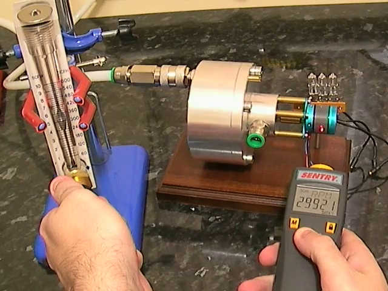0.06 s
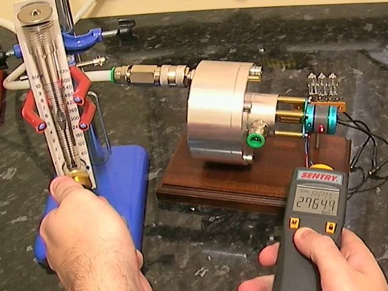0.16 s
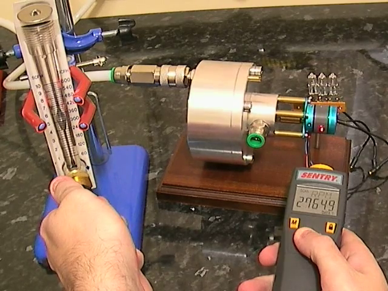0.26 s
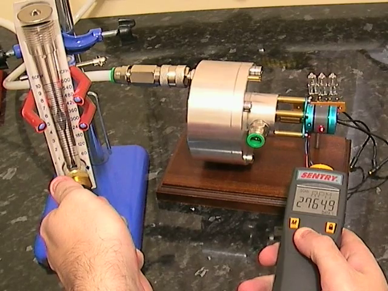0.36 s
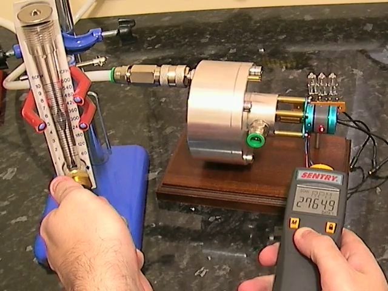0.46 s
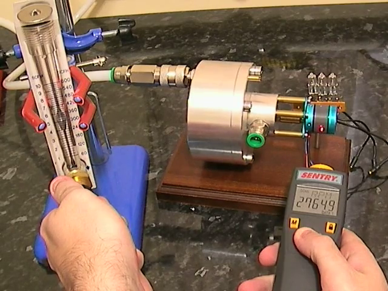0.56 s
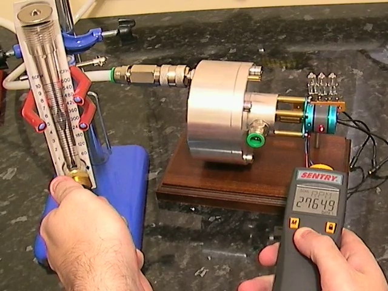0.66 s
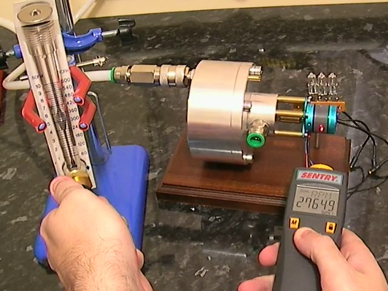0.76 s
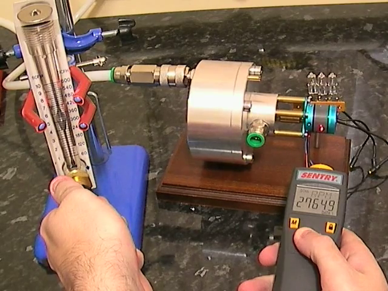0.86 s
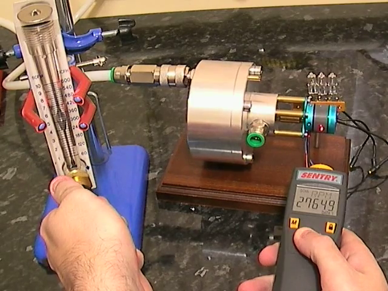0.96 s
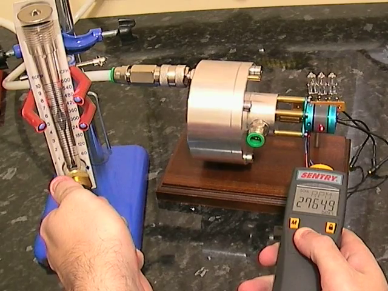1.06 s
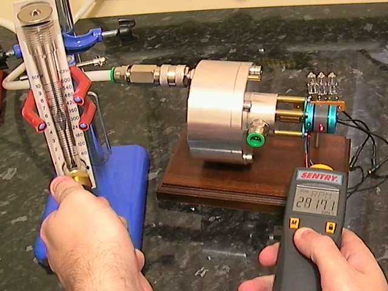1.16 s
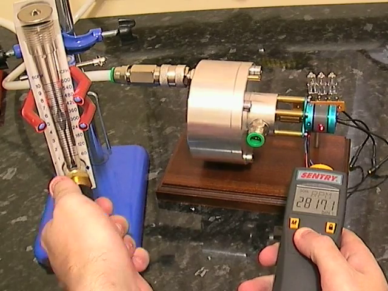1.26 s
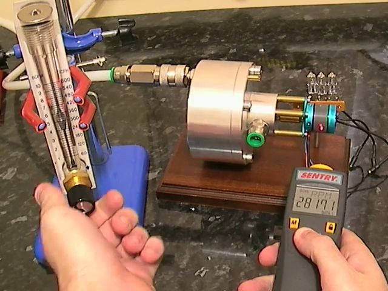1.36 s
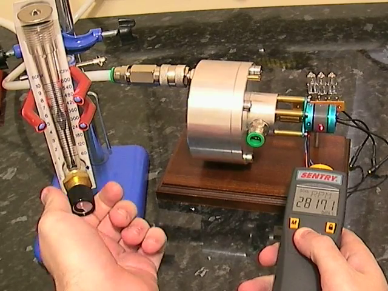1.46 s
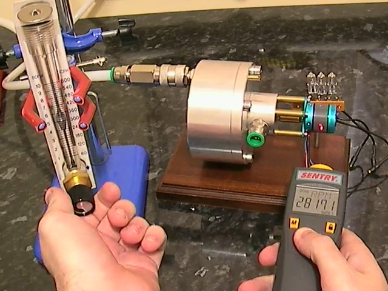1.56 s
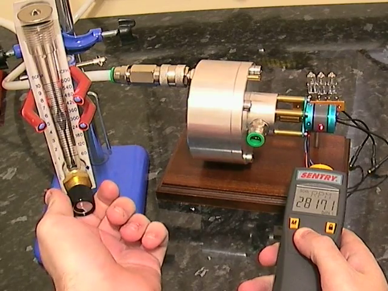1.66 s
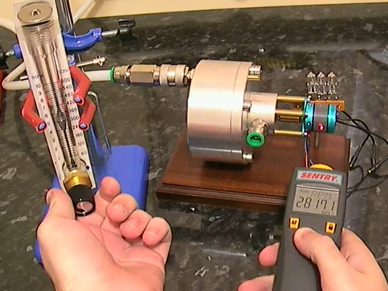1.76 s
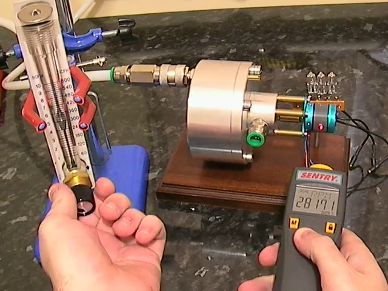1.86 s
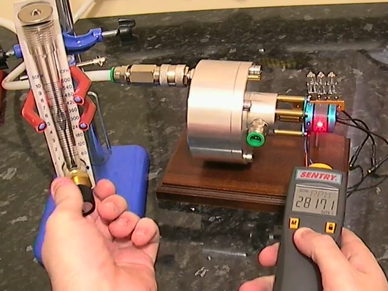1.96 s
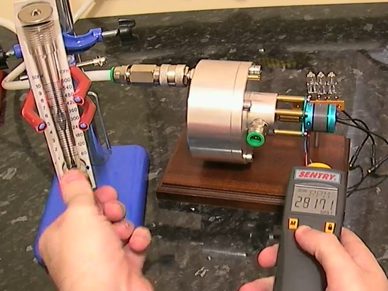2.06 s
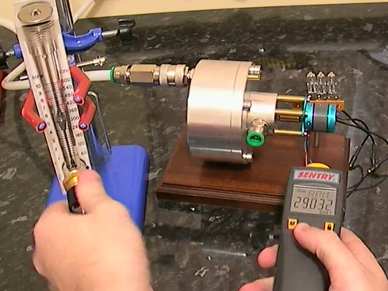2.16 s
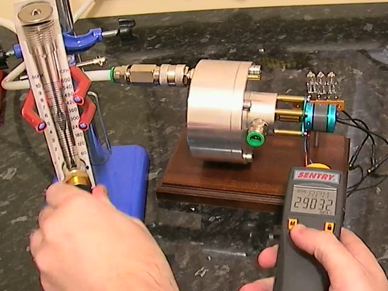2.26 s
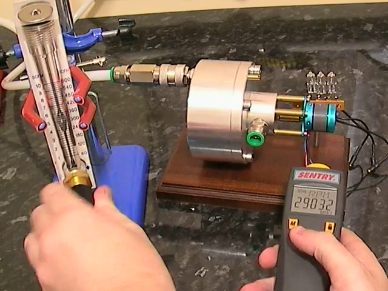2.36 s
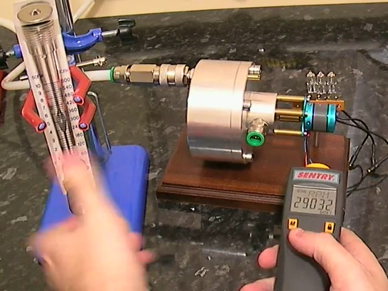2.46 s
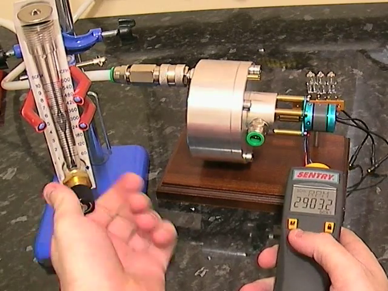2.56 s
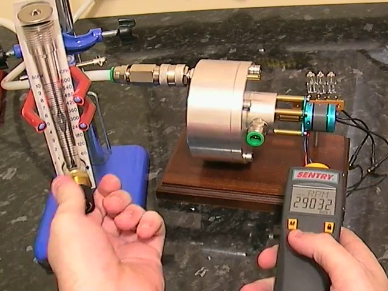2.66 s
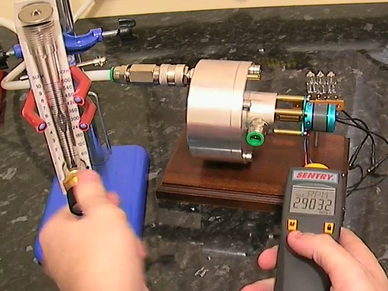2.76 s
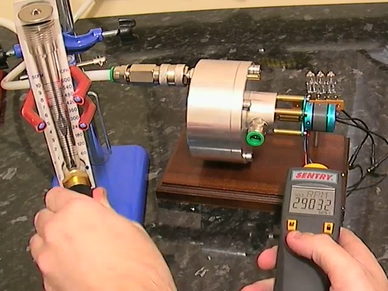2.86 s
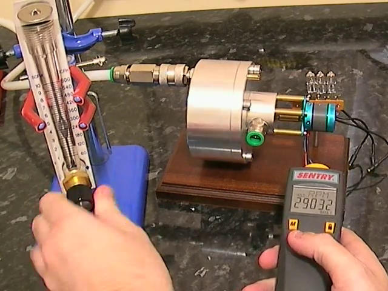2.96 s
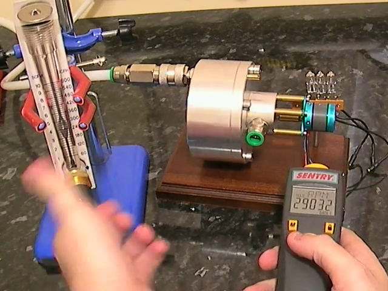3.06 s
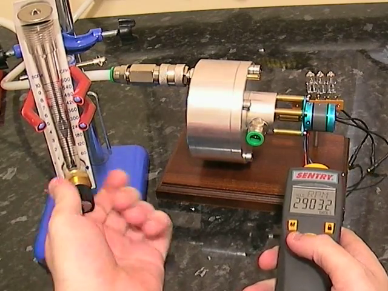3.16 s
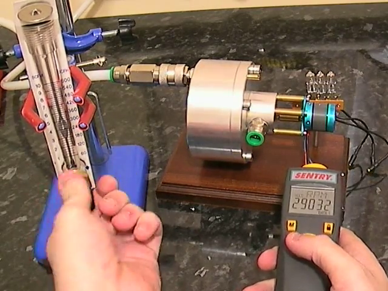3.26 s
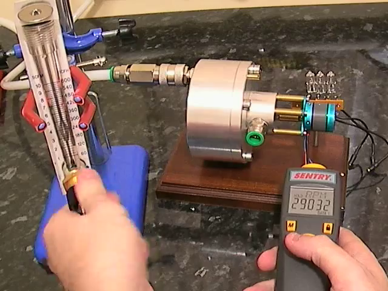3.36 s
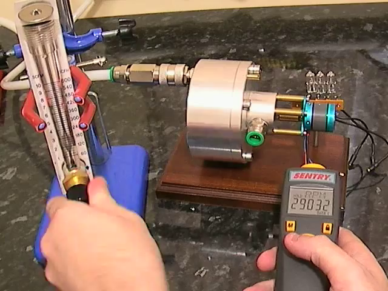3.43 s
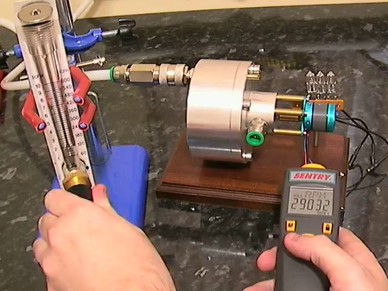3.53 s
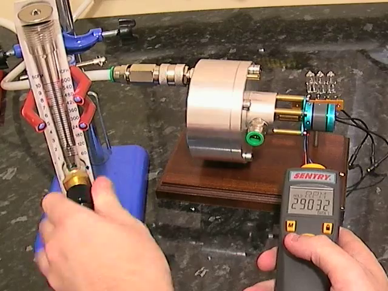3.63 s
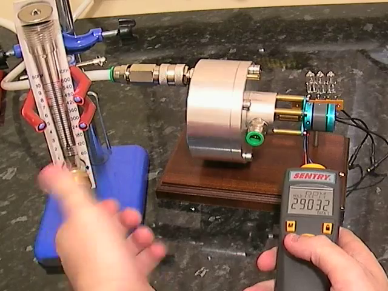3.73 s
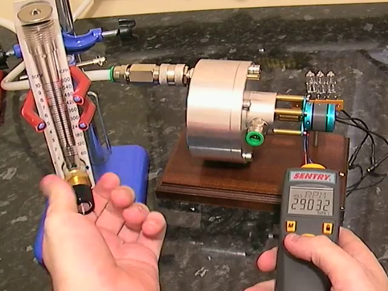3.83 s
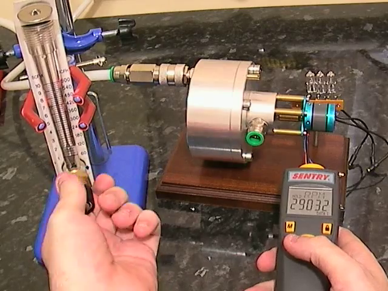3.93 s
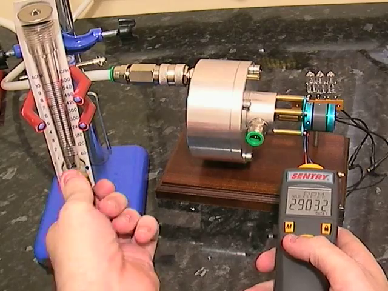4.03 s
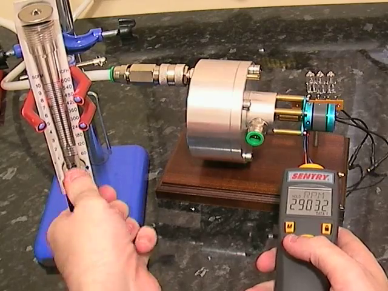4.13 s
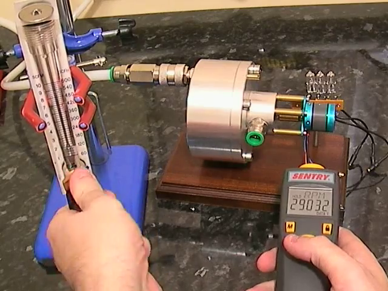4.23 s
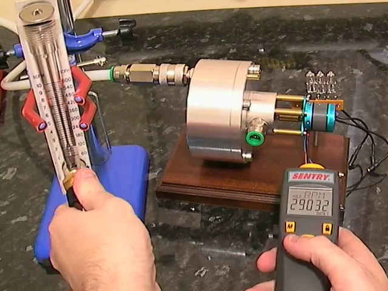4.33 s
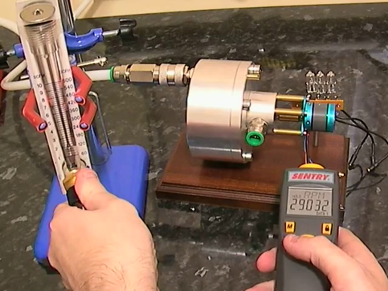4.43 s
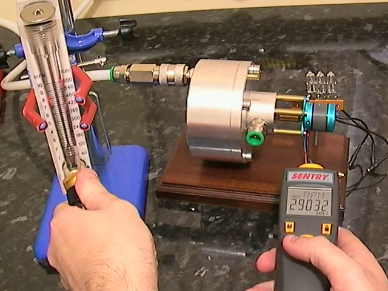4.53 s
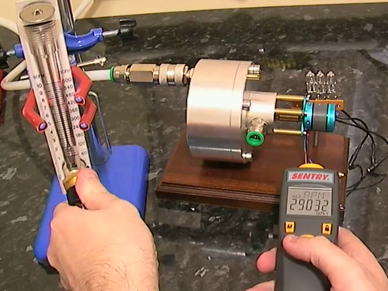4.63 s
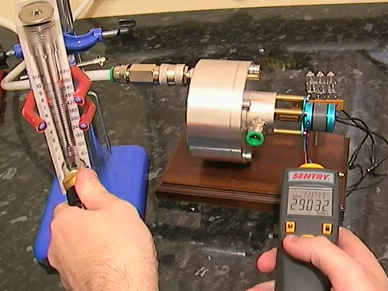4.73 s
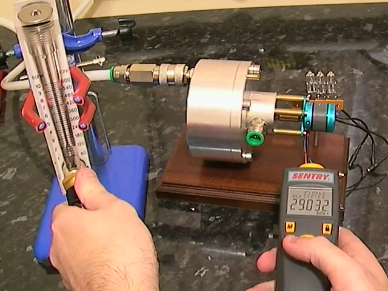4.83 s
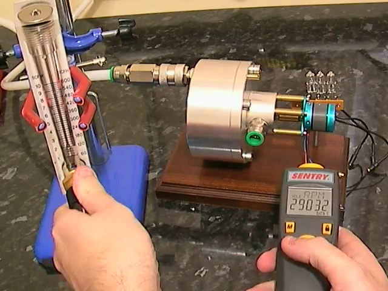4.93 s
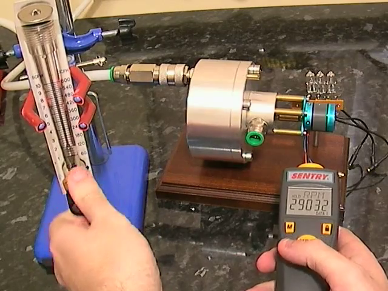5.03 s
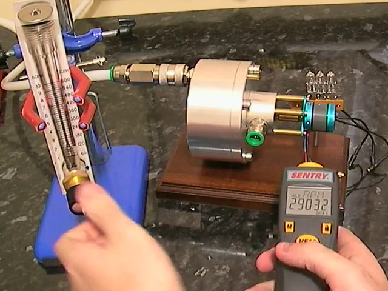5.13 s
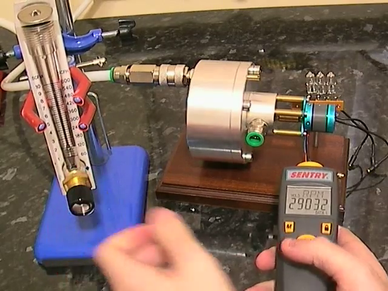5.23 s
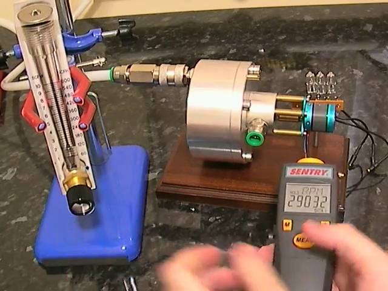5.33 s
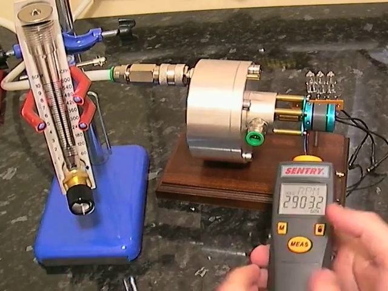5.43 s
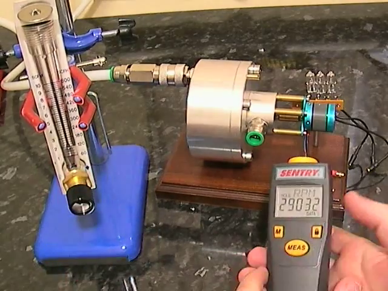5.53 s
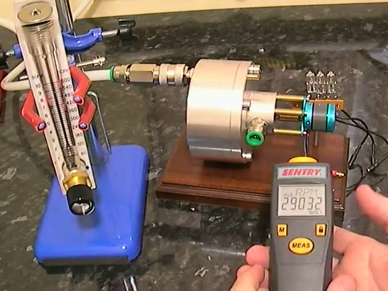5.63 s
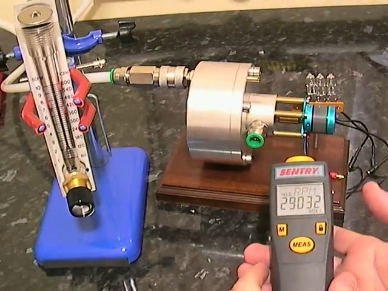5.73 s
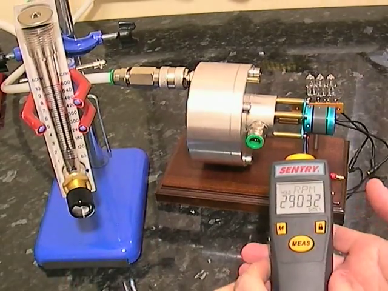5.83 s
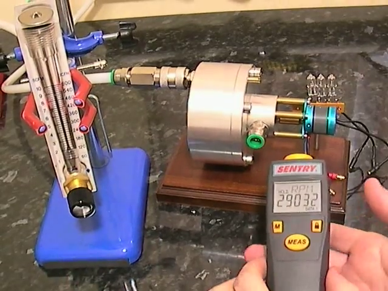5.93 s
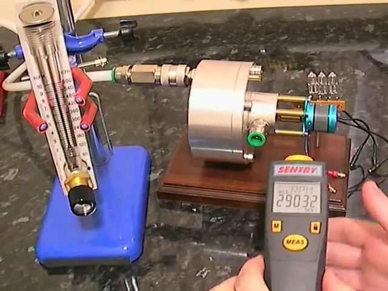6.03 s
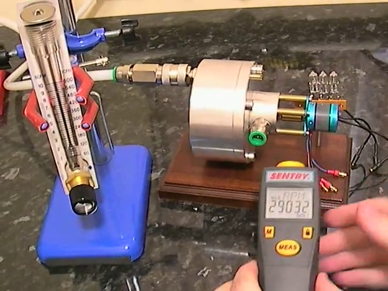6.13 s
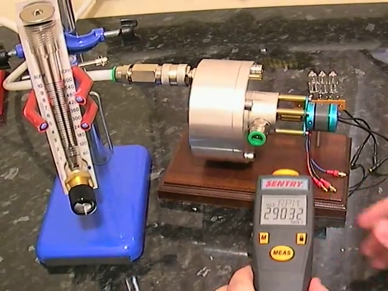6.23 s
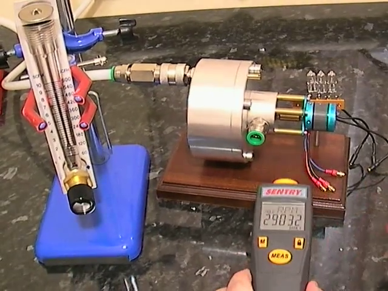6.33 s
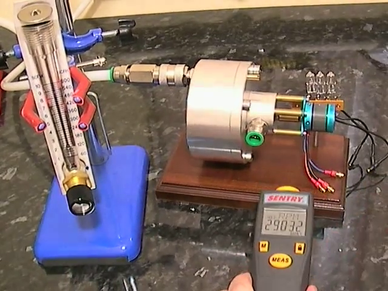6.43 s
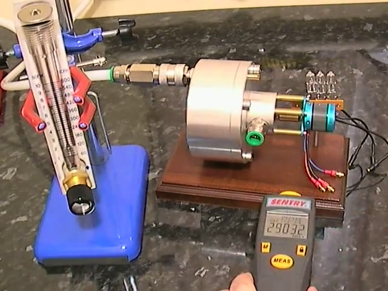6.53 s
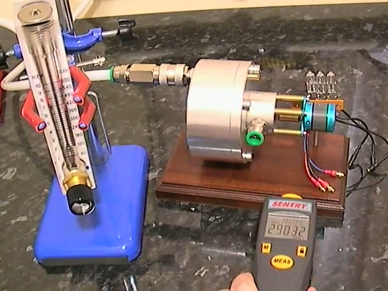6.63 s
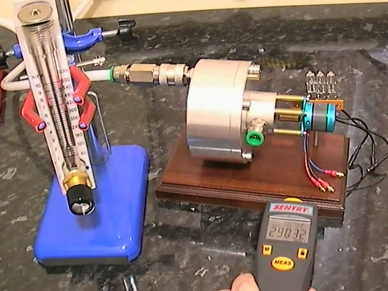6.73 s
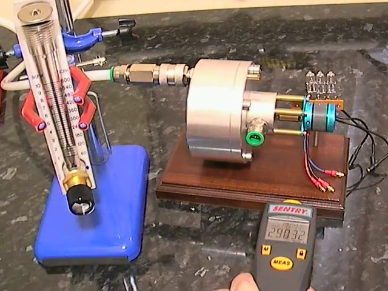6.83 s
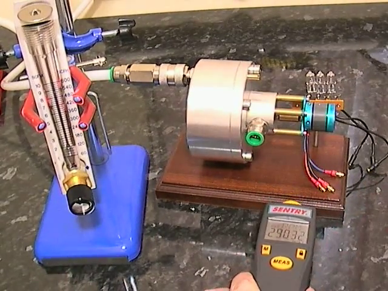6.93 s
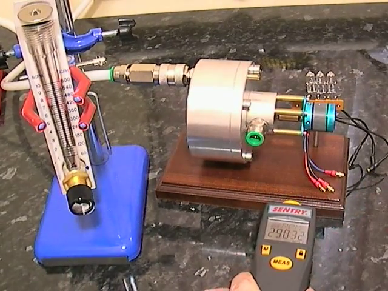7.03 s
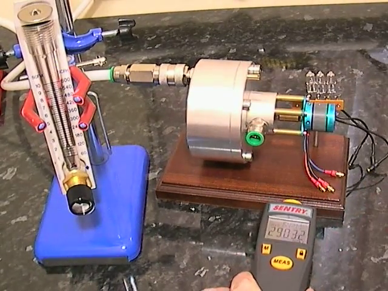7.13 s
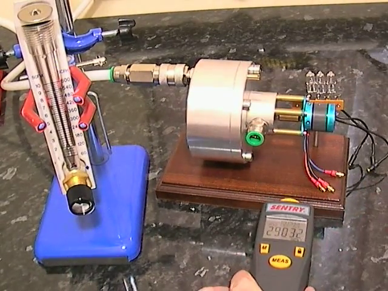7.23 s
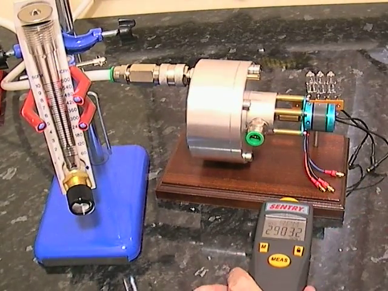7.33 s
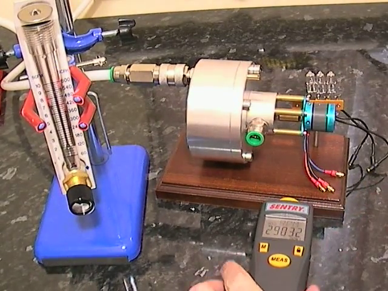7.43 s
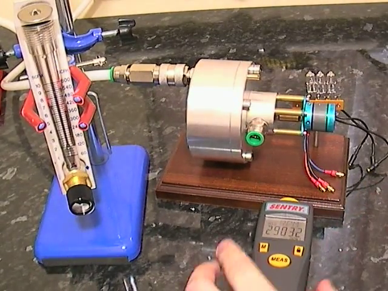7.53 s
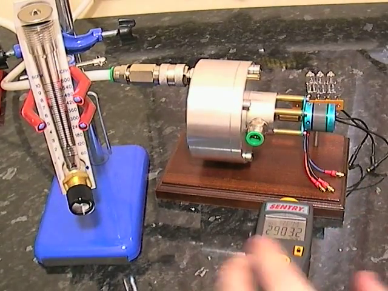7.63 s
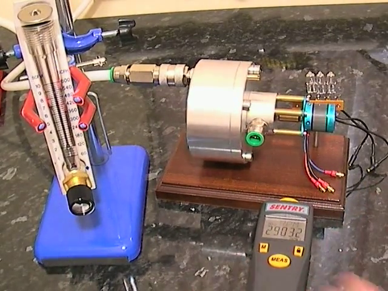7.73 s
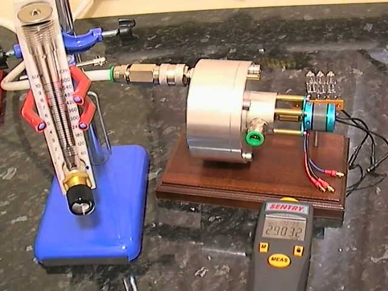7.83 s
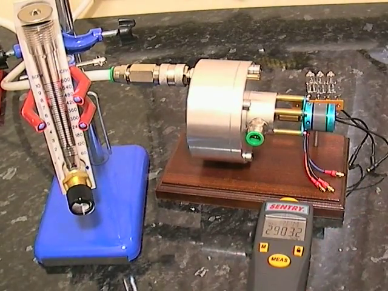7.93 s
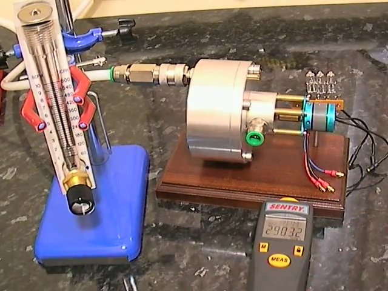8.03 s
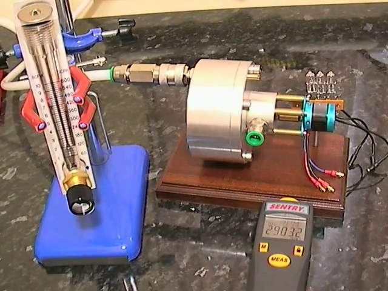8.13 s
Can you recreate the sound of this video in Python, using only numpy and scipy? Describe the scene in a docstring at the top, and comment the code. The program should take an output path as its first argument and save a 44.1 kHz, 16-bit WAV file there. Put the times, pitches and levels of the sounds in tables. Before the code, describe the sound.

Jet hiss dies away, a fast rotor screams briefly and slides down in pitch, slowing into hum, bearing rattle and faint bench rumble.

```python
"""A small 14-blade air turbine runs at about 29000 rpm on its wooden base, then whines loudly and coasts down.
Place: a small room. Distance: close by. Microphone: stereo, with the exhaust to its right.
As the valve is screwed shut, the jet noise, hiss and sizzle die and the rotor slows by friction and drag.
Blade tones sweep through exhaust and metal resonances; unbalance and bearing rattle, through base and housing.
Hand knocks and bench rumble lie around it; the recorder ducks under loud sound."""
import sys
import numpy as np
from scipy import signal
from scipy.fft import rfft, irfft, next_fast_len
from scipy.io import wavfile
from scipy.ndimage import uniform_filter1d, minimum_filter1d

SR = 44100
rng = np.random.default_rng(int(sys.argv[2]) if len(sys.argv) > 2 else 0)


def wav_record(signal):
    """Record a signal, one row per channel, as 16-bit PCM in the file named by sys.argv[1]."""
    frames = np.transpose(np.atleast_2d(signal))
    bounded = np.clip(frames, -1, 1)
    # unit amplitude maps onto the largest positive 16-bit level
    quanta = np.round(bounded * 32767).astype(np.int16)
    wavfile.write(sys.argv[1], SR, quanta)


N = 360734
TIME = np.arange(N) / SR
SIZE = next_fast_len(N + SR // 2, True)
FREQ = np.maximum(np.arange(SIZE // 2 + 1) * SR / SIZE, 1)

# Background: relative colour of the faint steady hiss and of the bench rumble: f/Hz, level/dB
QUIET_COLOUR = [(1710, -1), (2900, -0.5), (3830, -4), (4330, -3.5), (5430, 4), (6720, -1), (7650, -5),
                (7950, -40), (8160, -11), (8590, -10), (10200, -0.5), (13000, -2), (13600, -6)]
RUMBLE_COLOUR = [(18, -52), (30, -20), (86, -14.5), (123, -2.5), (151, -4), (237, 4), (265, 1.5), (330, -1),
                 (430, -38), (730, -120)]
# Small knocks of handling: t/s, level/dB, centre f/Hz, width/Hz, decay/s
HAND_KNOCKS = [(5.81, -38, 3800, 2500, .008), (6.44, -44, 11000, 4000, .004), (7.143, -33, 260, 110, .01),
               (7.195, -30, 3300, 1300, .0025), (7.203, -39, 3300, 1300, .004)]
# Air flow as the valve is screwed shut: t/s, share of full flow
AIR_FLOW = [(0.0, 1.0), (1.5, 0.982), (2.25, 0.943), (2.771, 0.877), (2.907, 0.645), (3.305, 0.604),
            (3.493, 0.0)]
# Treble at the valve, before its trims: t/s, hiss level/dB, sizzle level/dB
VALVE_LEVELS = [(0.0, -21, -20), (0.01, -22.5, -25), (1.3, -22, -25.5), (1.4, -25.5, -19.5),
                (2.41, -23.5, -25), (2.65, -24.5, -22.5), (2.98, -19, -29), (3.11, -25, -26),
                (3.3, -23, -26)]
# Relative colour of the jet and of the valve hiss: f/Hz, level/dB
JET_COLOUR = [(330, -22.5), (560, -18.5), (728, -16), (886, -12.5), (945, -6.5), (1030, -15), (1200, -5.5),
              (1300, -12.5), (1600, -15), (2580, -1.5), (4400, 3), (5660, -8.5), (7040, -1.5), (7600, -15),
              (9880, -10.5), (16700, -120)]
HISS_COLOUR = [(4940, -25), (8400, -23), (9330, -1.5), (10300, 6.5), (12000, 2.5), (12300, -14),
               (16000, -37), (22000, -120)]
# Narrow housing resonances rung by the jet, relative level: f/Hz, width/Hz, level/dB
JET_HOUSING = [(2530, 85, -1.5), (3470, 170, -3), (4414, 30, 7), (4740, 410, -1)]
# Narrow housing resonances rung by the bearings, relative level: f/Hz, width/Hz, level/dB
BEARING_HOUSING = [(2584, 54, 0.5), (4523, 56, 6.5), (5490, 130, -1.5), (6320, 180, -1), (6540, 89, -1.5)]
# Relative colour of the rolling rush of the bearings: f/Hz, level/dB
RUSH_COLOUR = [(1650, -6.5), (2800, 1.5), (3150, -3), (4190, 0.5), (4510, -14), (4850, 0.5), (6790, -1.5),
               (7700, -9), (7910, -9), (8620, -11), (10400, -3.5), (12200, -9.5), (13600, -10)]
# Resonances of base and housing: f/Hz, width/Hz, level/dB
BODY_MODES = [(126.5, 8.9, -11.5), (178.8, 13, -9), (195.3, 5, -9), (245, 122, -9.5), (291, 20, -1.5),
              (324.4, 31, -9), (438, 4.7, -20.5), (487.6, 36, -16.5), (534.5, 17, -10.5), (625, 56, -11.5),
              (693.4, 25, -10), (801, 79, -7), (973, 184, -15.5), (1069, 46, -12.5), (1240, 300, -17),
              (1503, 63, -8), (1646, 196, -15.5), (1770, 170, -14), (1890, 90, -13), (2031, 118, -13),
              (2360, 600, -20), (2616, 60, -14), (3096, 82, -23), (3290, 51, -25), (4400, 630, -25.5)]
# Antiresonances between the modes of the base: f/Hz, half-width/Hz, depth 0-1
BODY_DIPS = [(221, 6.4, 1), (302.3, 13.2, 0.87), (357.6, 7.3, 1), (1216, 48, 0.07), (1634, 31, 0.5)]
# Relative force of one turn: multiple of the speed, level/dB
TURN_ORDERS = [(1, 6.5), (2, 0), (3, 0.5), (4, -1), (5, -2.5), (6, 1.5), (7, -3.5), (8, -1.5), (9, -3),
               (10, -1.5), (11, -3.5), (12, -2.5), (13, 2.5), (15, -4), (18, -2.5), (20, -4), (45, -16)]
# Weak whirl tones between the orders at full flow: multiple of the speed, level/dB
WHIRL_TONES = [(1.5, -42.5), (2.5, -36.5), (2.59, -45), (3.5, -43)]
# Exhaust resonances that the blade tone sweeps through: f/Hz, width/Hz, level/dB
EXHAUST_MODES = [(4500, 210, -23), (5050, 410, -9), (5410, 470, -0.5), (5790, 360, 2), (5958, 80, 5),
                 (6537, 190, -18)]
# Antiresonances of the exhaust passage: f/Hz, half-width/Hz, depth 0-1
EXHAUST_NOTCHES = [(6105, 45, .85), (6566, 13, .8)]
# Narrow metal rings, low and high, swept by the blade overtones: f/Hz, width/Hz, level/dB
METAL_RINGS = [(2433, 260, 7), (6920, 420, -1.5)]
# Relative coasting overtones: multiple of the speed, level/dB into low ring, level/dB into high ring
COAST_OVERTONES = [(14, -1, -30), (28, -3.5, 1), (36.5, -7, -8), (42, -12, -3), (56, -6, -3), (70, 2, -30),
                   (84, 4, -30)]
# Levels that follow the rotor: level/dB from the knee up, knee f/Hz, power of the speed below it,
# change at full flow/dB
BENCH_LAW = (-47.5, 61, 1, 2.5)
RUSH_LAW = (-20, 333, 2.09, -6.5)
RATTLE_LAW = (-26.5, 349, 0.96, -11)
SHAKE_LAW = (-13, 302, 1.47, -6)

BLADES = 14
# rotor: speed at the start, push of the full flow, dry friction, drag in proportion to the speed
START_HZ, DRIVE_HZ_PER_S, FRICTION_HZ_PER_S, DRAG_PER_S = 489.4, 224.06, 13.875, .4386
# jet level at full flow, and the power of the flow that it follows
JET_DB, JET_POWER = -17.5, 0.63
# below this speed the whine breaks up, fully so once it has slowed by the range
BREAKUP_HZ, BREAKUP_RANGE_HZ = 300, 40
# below this speed the shaft goes slack in its bearings
SLACK_HZ = 104
# recorder: gain-control ceiling and recovery, narrow treble notch, top of its band
CEILING_DB, RELEASE_DB_PER_S = -5, 65
NOTCH_HZ, TOP_HZ = 7950, 13700


def undb(db):
    """Decibels to gain."""
    return 10 ** (np.asarray(db) / 20)


def curve(table, axis=1):
    """One column of a table, joined by straight lines in time."""
    rows = np.array(table)
    return np.interp(TIME, rows[:, 0], rows[:, axis])


def unit(x):
    """Scale to rms 1."""
    return x / np.sqrt(np.mean(x ** 2))


def walk(rate):
    """Random drift in straight lines between points, rate per second, of rms about 1.4."""
    count = int(TIME[-1] * rate) + 3
    return 1.72 * np.interp(TIME * rate, np.arange(count), rng.standard_normal(count))


def colour(points):
    """Gain over frequency through the points, with 12 dB per octave of fall below the first."""
    hz, db = np.transpose(points)
    gain = undb(np.interp(np.log(FREQ), np.log(hz), db))
    return gain * np.minimum(FREQ / hz[0], 1) ** 2


def resonances(modes):
    """Gain over frequency of steep-sided resonances, summed in power."""
    power = 0
    for hz, width, db in modes:
        detuning = (FREQ / hz - hz / FREQ) * hz / width
        power = power + undb(db) ** 2 / (1 + detuning ** 2) ** 2
    return np.sqrt(power)


def notch(hz, width, depth=1):
    """Gain over frequency of a narrow dip."""
    return 1 - min(depth, 1) / (1 + ((FREQ - hz) / width) ** 2)


def notches(dips):
    """Gain over frequency of several narrow dips."""
    return np.prod([notch(*dip) for dip in dips], axis=0)


def shape(x, gain):
    """Filter by a gain over frequency."""
    return irfft(rfft(x, SIZE) * gain, SIZE)[..., :N]


def noise(gain, width, gate=1):
    """Coloured stereo noise of rms 1; width is the ratio of side to mid signal."""
    mid, side = rng.standard_normal((2, N))
    stereo = mid + width * side * np.array([[1], [-1]])
    return unit(shape(gate * stereo, gain))


def pan(x, db):
    """Place a sound by a level difference; positive is left, negative right."""
    return x * undb(np.array([[db], [-db]]) / 2)


def room(x, wet_db, t60):
    """Add dense reflections, different at each ear; the bass stays direct."""
    t = np.arange(SR // 3) / SR
    tail = rng.standard_normal((2, len(t))) * undb(-60 * t / t60) * (t > .002)
    tail = signal.sosfilt(signal.butter(1, 900, "high", fs=SR, output="sos"), tail)
    tail /= np.sqrt(np.sum(tail ** 2, axis=1, keepdims=True))
    return x + undb(wet_db) * signal.fftconvolve(x[None], tail, axes=1)[:, :N]


def law(speed, flow, db, knee_hz, power, driven_db):
    """Level in dB that grows with the speed up to a knee and shifts with the push of the air."""
    return db + 20 * power * np.log10(np.minimum(speed / knee_hz, 1)) + driven_db * flow


def spin(flow):
    """Turns per second of the rotor: the air pushes, friction and drag brake."""
    push = (DRIVE_HZ_PER_S * flow - FRICTION_HZ_PER_S) / SR
    gained = signal.lfilter([1], [1, -np.exp(-DRAG_PER_S / SR)], push)
    return START_HZ * np.exp(-DRAG_PER_S * TIME) + gained


def background(speed, flow):
    """Low rumble of the bench, which fades with the last slow turns, and a faint steady hiss."""
    rumble = noise(colour(RUMBLE_COLOUR) / (1 + (FREQ / 300) ** 10), .4)
    rumble = pan(rumble, -1.3) * undb(law(speed, flow, *BENCH_LAW) + 1.2 * walk(8))
    return rumble + noise(colour(QUIET_COLOUR), 0.66) * undb(-40.5)


def knocks():
    """Short dull or bright taps from the hands: noise bands that start at once and die exponentially."""
    out = np.zeros(N)
    for start, db, hz, width, decay in HAND_KNOCKS:
        edges = [max(hz - width / 2, 30), hz + width / 2]
        band = signal.butter(2, edges, "band", fs=SR, output="sos")
        tap = unit(signal.sosfilt(band, rng.standard_normal(N)))
        out += undb(db) * tap * (TIME > start) * np.exp(-abs(TIME - start) / decay)
    return out


def air(flow, hiss_db, sizzle_db, choke_flow):
    """The jet roars in the housing; the valve adds hiss and a thin sizzle until it chokes the flow."""
    roar = noise(colour(JET_COLOUR), 0.11) + undb(-5.0) * noise(resonances(JET_HOUSING), 0.63)
    jet = pan(roar, -1.0) * undb(JET_DB + 0.53 * walk(24.72)) * flow ** JET_POWER
    hiss_level = undb(curve(VALVE_LEVELS) + hiss_db + 0.58 * walk(24.9))
    hiss = pan(noise(colour(HISS_COLOUR), 0.56), -3.0) * hiss_level
    sizzle_level = undb(curve(VALVE_LEVELS, axis=2) + sizzle_db + 0.5 * walk(31.3))
    sizzle = pan(noise(resonances([(12870, 720, 0)]), .4), .3) * sizzle_level
    return jet + (hiss + sizzle) * np.minimum(flow / choke_flow, 1)


def bearings(turns, speed, flow, body, ring_db, bright):
    """Balls rattle in a burst once a turn, over a rolling rush that rings the housing."""
    size = undb(1.1 * rng.standard_normal(4096))[turns.astype(int) % 4096]
    since_burst = (turns % 1) / speed  # seconds
    burst = .2 + size * np.exp(-since_burst / .0025)
    burst /= np.sqrt(uniform_filter1d(burst ** 2, SR // 4))  # even out the level as the bursts spread
    rattle = noise(body * np.minimum(FREQ / 2000, 1) ** bright, 0.24, burst)
    rattle *= undb(law(speed, flow, *RATTLE_LAW))
    rings = undb(ring_db + 1.5 * walk(30)) * noise(resonances(BEARING_HOUSING), .5, burst)
    rush = noise(colour(RUSH_COLOUR), 0.52) + rings
    rush *= undb(law(speed, flow, *RUSH_LAW) + .5 * walk(12))
    return pan(rattle + rush, -2.4)


def whirl(turns, flow):
    """Under drive the shaft also whirls in its bearings, sounding between the orders."""
    tones = 0
    for k, db in WHIRL_TONES:
        tones = tones + undb(db + 0.53 * walk(8)) * np.sin(2 * np.pi * k * turns)
    return flow * tones


def rotor(turns, speed, flow, body, flutter_db, slop, slack_gain, wobble):
    """Unbalance and a bump each turn shake the body; once unloaded the shaft wobbles in its bearings."""
    orders, db = np.transpose(TURN_ORDERS)
    # a slow shaft knocks about more freely, so its orders dissolve into rumble
    slack = 1 + slack_gain * np.maximum(1 - speed / SLACK_HZ, 0)
    angle = 2 * np.pi * (turns + slop * slack * walk(60))
    loose = (1 - .9 * flow) * np.minimum(speed / SHAKE_LAW[1], 1) ** .5
    force = np.sin(angle) * undb(db[0]) * (1 + wobble * loose * walk(110))
    for k in range(2, 41):
        if k != BLADES:  # the blade order sounds in blades()
            flutter = flutter_db * (1 - 0.8 * flow) * walk(18)
            level = undb(np.interp(k, orders, db) + flutter)
            force += level * np.sin(k * angle + rng.uniform(0, 2 * np.pi))
    return shape(force * undb(law(speed, flow, *SHAKE_LAW)), body)


def blades(turns, speed, flow, whine_db, octave_db, upper_db, ring_db, flutter_db, breakup_db, jitter):
    """Blades chop the air into a whine that flares in the exhaust; slower, it breaks up and rings the metal."""
    shaft = 2 * np.pi * turns + jitter * walk(150) / BLADES
    broken = np.clip((BREAKUP_HZ - speed) / BREAKUP_RANGE_HZ, 0, 1)
    exhaust = resonances(EXHAUST_MODES) * notches(EXHAUST_NOTCHES)
    passage = np.interp(BLADES * speed, FREQ, exhaust)
    level_db = whine_db + flutter_db * walk(70) + broken * breakup_db * walk(21.4)
    # the blade tone, its octave and a faint higher order of the shaft
    blade, octave, upper = (np.sin(k * shaft) for k in (BLADES, 2 * BLADES, 33))
    tone = blade + undb(octave_db + 1.5 * walk(28.5)) * octave + undb(upper_db) * upper
    whine = passage * undb(level_db) * tone
    drive = broken * undb(ring_db + 0.76 * law(speed, flow, *SHAKE_LAW))
    for j, ring in enumerate(METAL_RINGS):
        overtones = 0
        for k, *dbs in COAST_OVERTONES:
            overtones = overtones + undb(dbs[j] + 2 * walk(30)) * np.sin(k * shaft)
        whine += shape(overtones * drive, resonances([ring]))
    return whine


def scene():
    """The air flow sets the speed; one count of turns drives every tone and rattle of the rotor."""
    flow = curve(AIR_FLOW)
    speed = spin(flow)
    turns = np.cumsum(speed) / SR
    body = resonances(BODY_MODES) * notches(BODY_DIPS)
    around = background(speed, flow) + knocks()
    jet = air(flow, hiss_db=0.5, sizzle_db=1.0, choke_flow=.25)
    rolling = bearings(turns, speed, flow, body, ring_db=-7, bright=1.0)
    hum = rotor(turns, speed, flow, body, flutter_db=3, slop=.004, slack_gain=9, wobble=.13)
    hum = room(hum + whirl(turns, flow), wet_db=-12, t60=.25)
    whine = blades(turns, speed, flow, whine_db=0.56, octave_db=-24.5, upper_db=-26, ring_db=-20.5,
                   flutter_db=1.9, breakup_db=2, jitter=0.16)
    whine = room(whine, wet_db=-14, t60=.2)
    # the exhaust lies to the right, so its whine reaches the left microphone 20 microseconds later
    late_left = np.exp(-2j * np.pi * FREQ * np.array([[2e-5], [0]]))
    tones = pan(hum, -1.5) + pan(shape(whine, late_left), -2.8)
    return around + jet + rolling + tones


def gain_control(x):
    """Turns everything down at once when the level passes the ceiling, then recovers steadily."""
    level_db = 10 * np.log10(uniform_filter1d(np.mean(x ** 2, axis=0), size=400) + 1e-12)
    excess_db = np.maximum(level_db - CEILING_DB, 0)
    recovery = RELEASE_DB_PER_S * TIME
    return x * undb(recovery - np.maximum.accumulate(excess_db + recovery))


def record(dry):
    """The recorder ducks under loud sound, limits the peaks, notches the treble and cuts the top."""
    held = gain_control(dry)
    allowed = .92 / np.maximum(abs(held).max(axis=0), .92)
    gain = uniform_filter1d(minimum_filter1d(allowed, size=300), size=300)
    notched = shape(held * gain, notch(NOTCH_HZ, 233))
    return signal.sosfilt(signal.ellip(10, .2, 80, TOP_HZ, fs=SR, output="sos"), notched)


dry = scene()
out = record(dry)
wav_record(out)
```